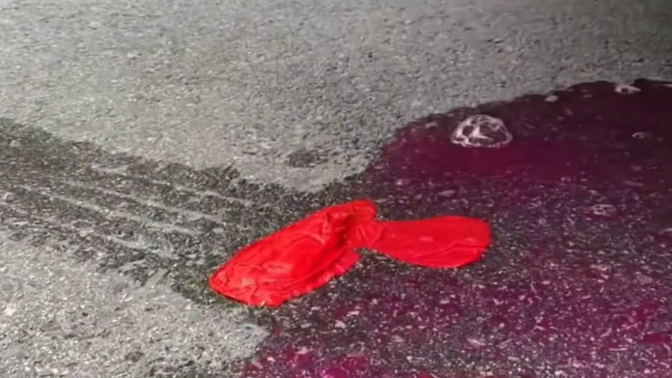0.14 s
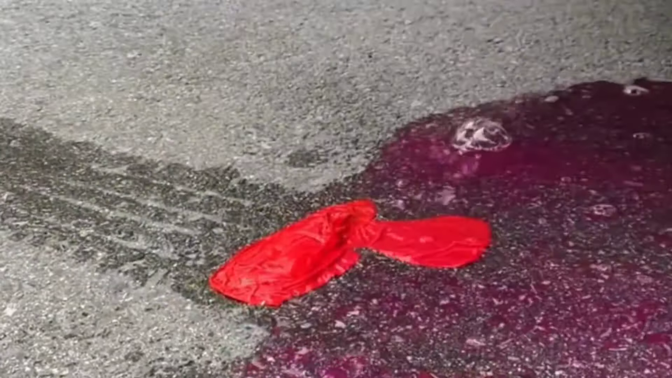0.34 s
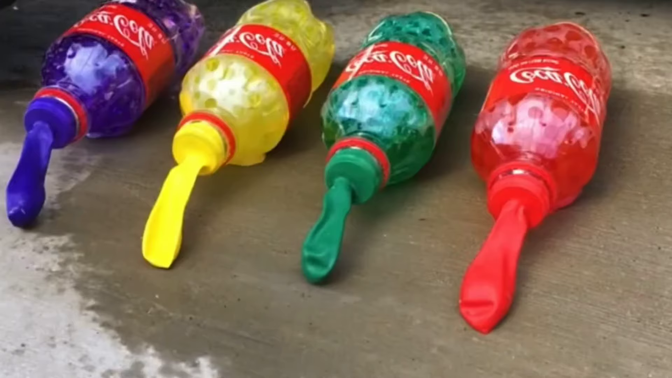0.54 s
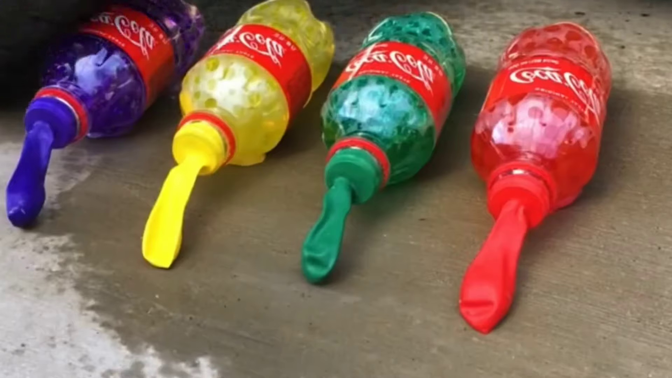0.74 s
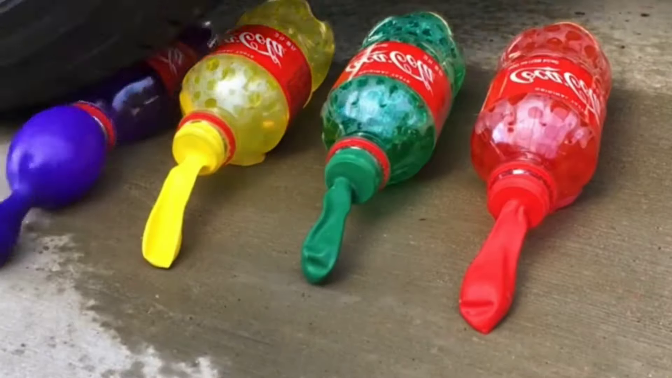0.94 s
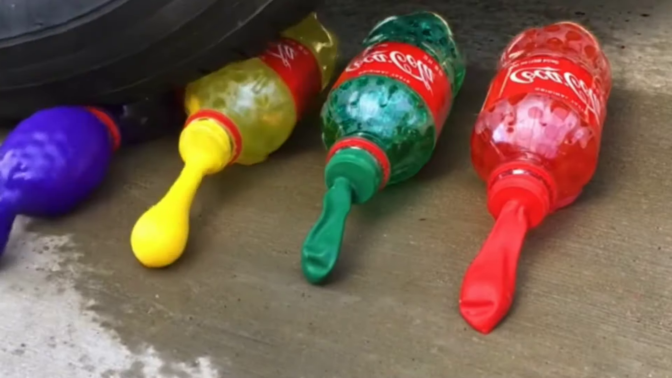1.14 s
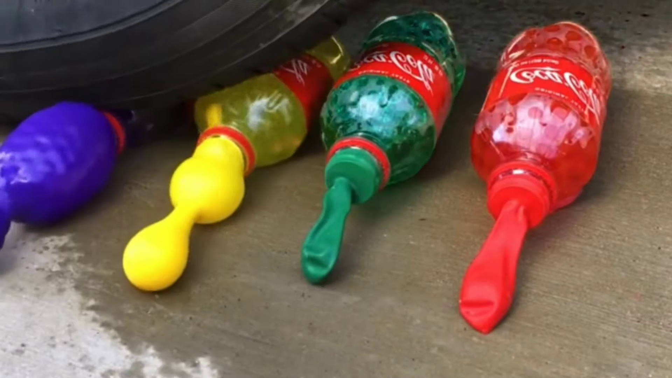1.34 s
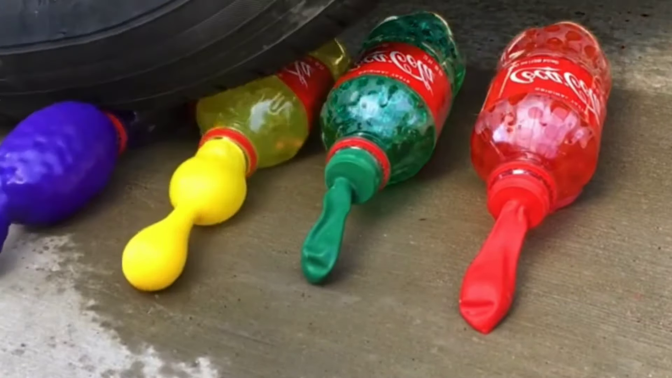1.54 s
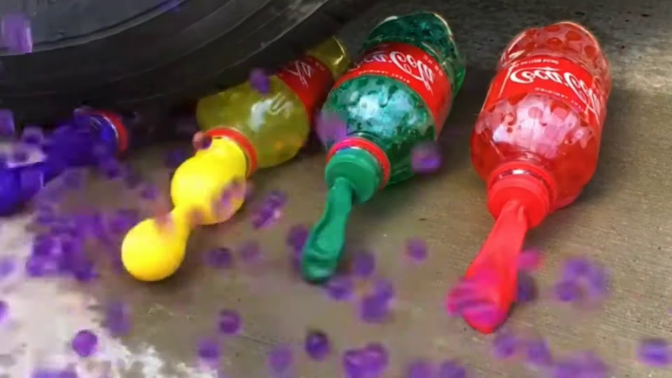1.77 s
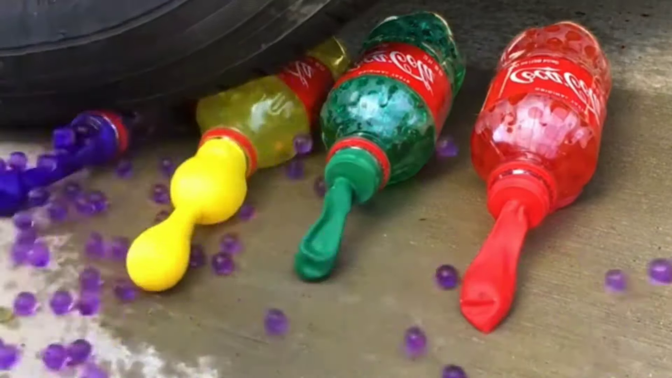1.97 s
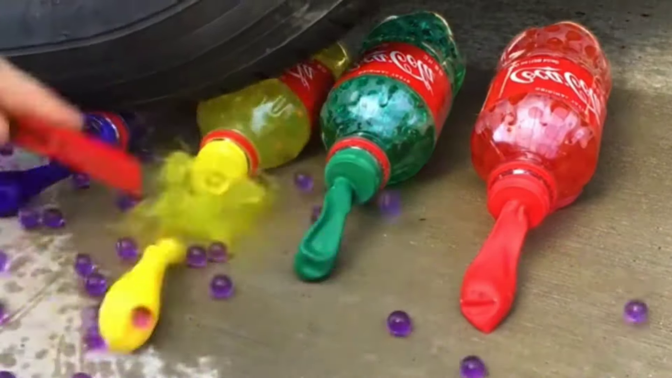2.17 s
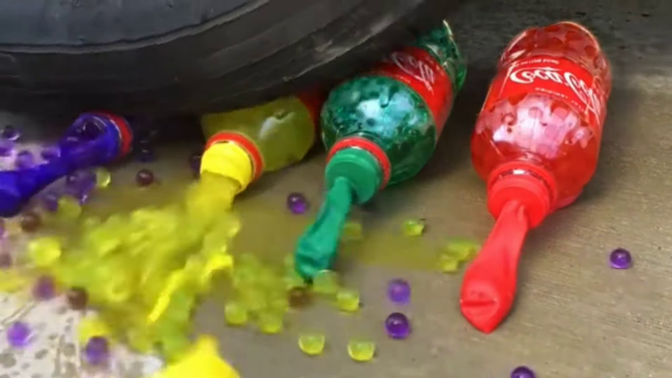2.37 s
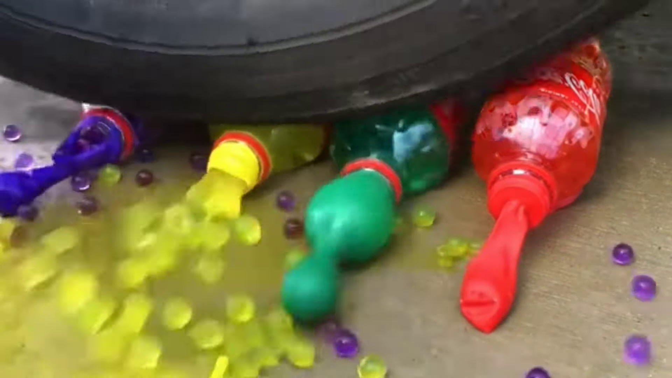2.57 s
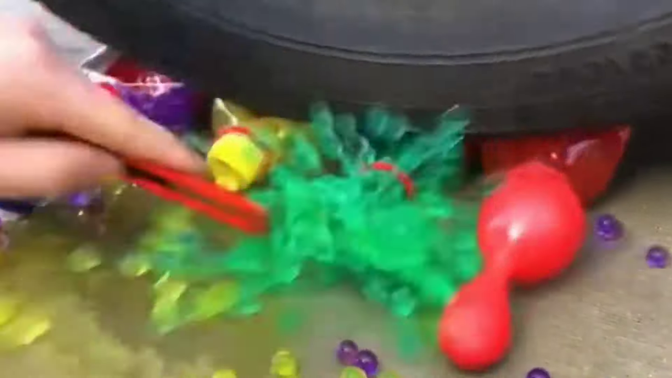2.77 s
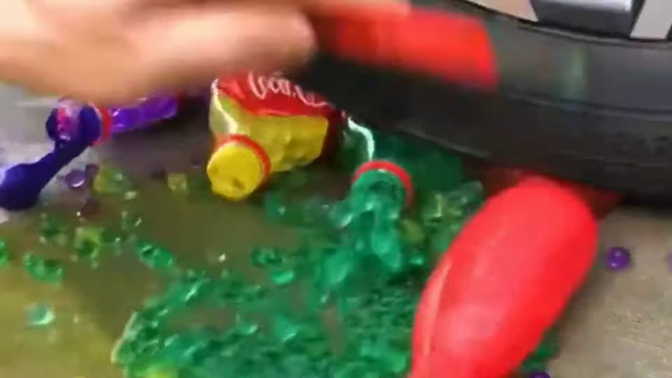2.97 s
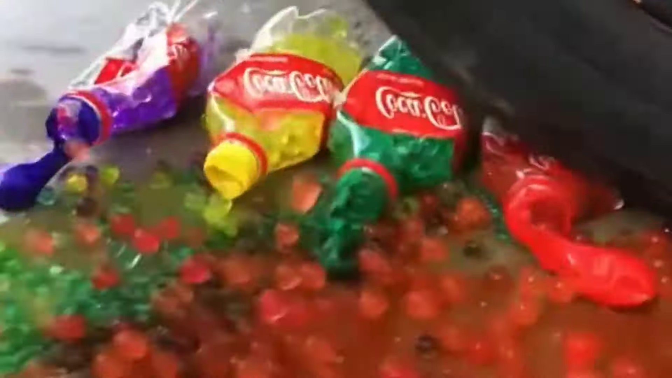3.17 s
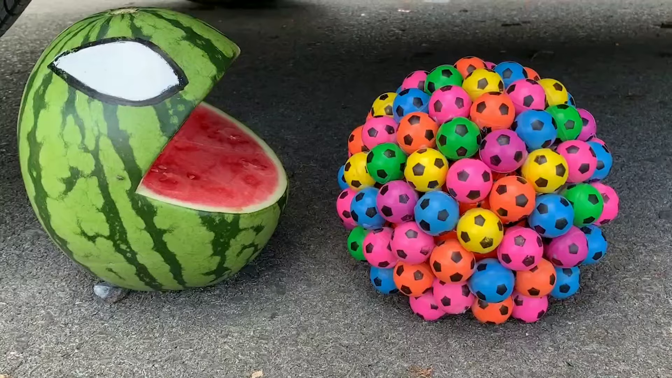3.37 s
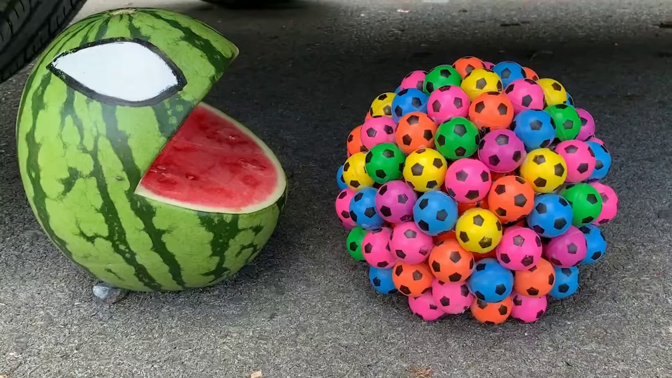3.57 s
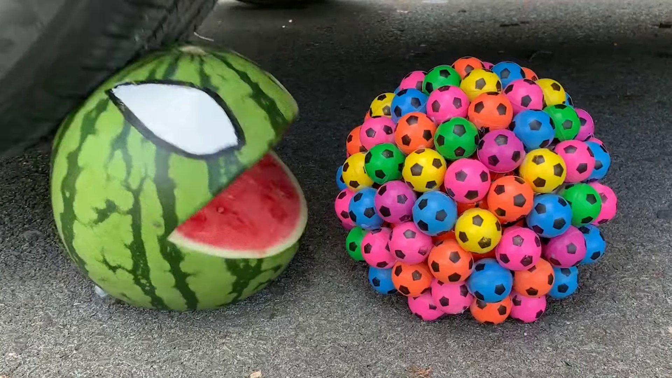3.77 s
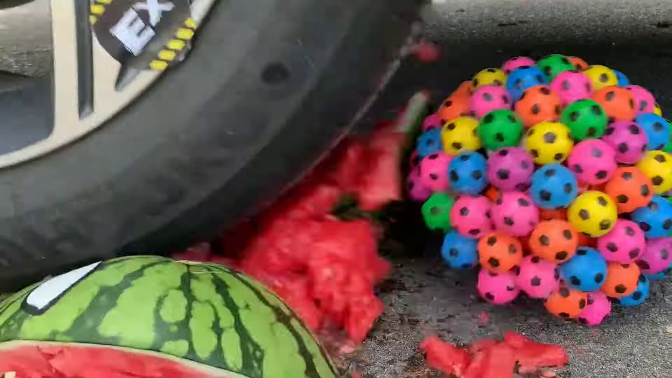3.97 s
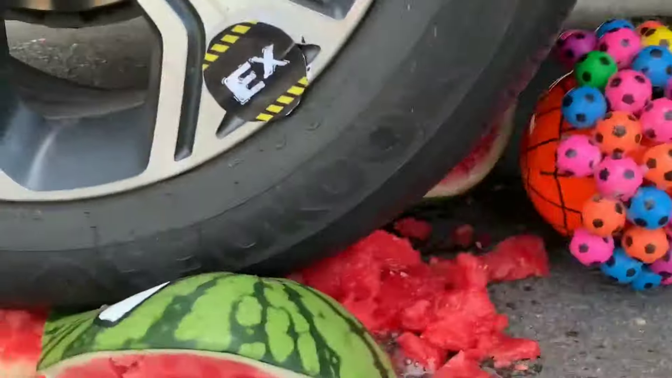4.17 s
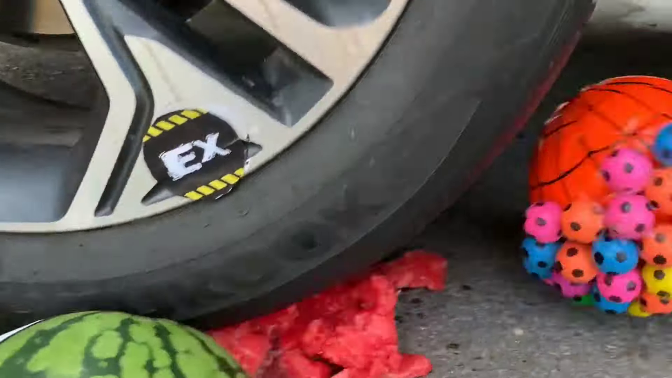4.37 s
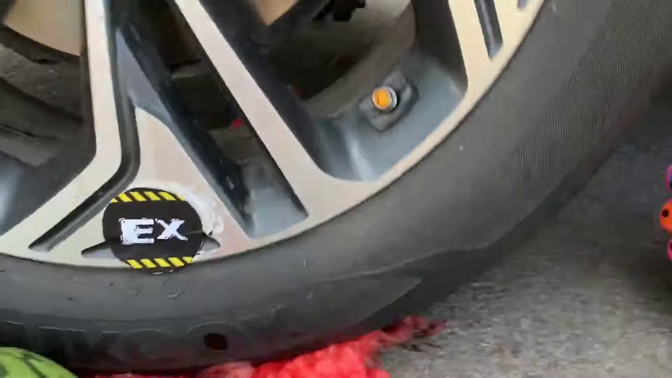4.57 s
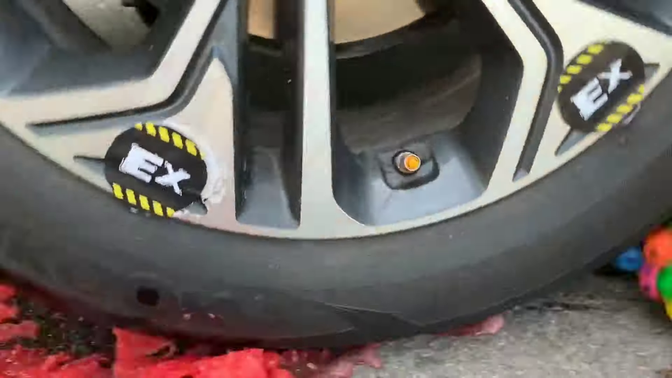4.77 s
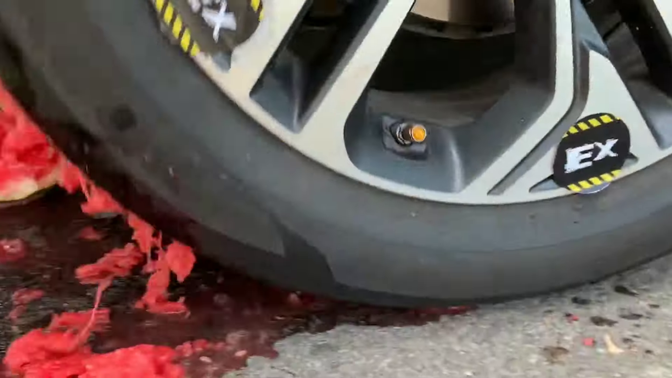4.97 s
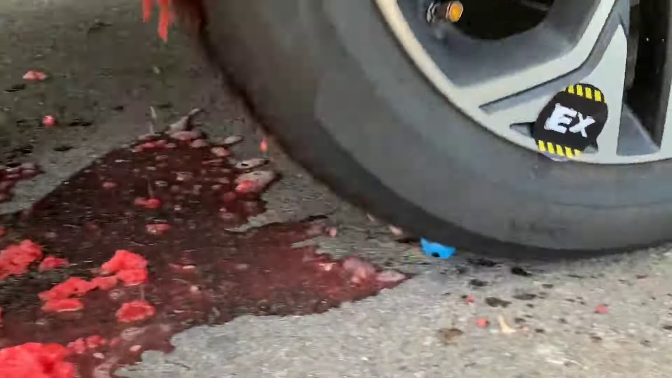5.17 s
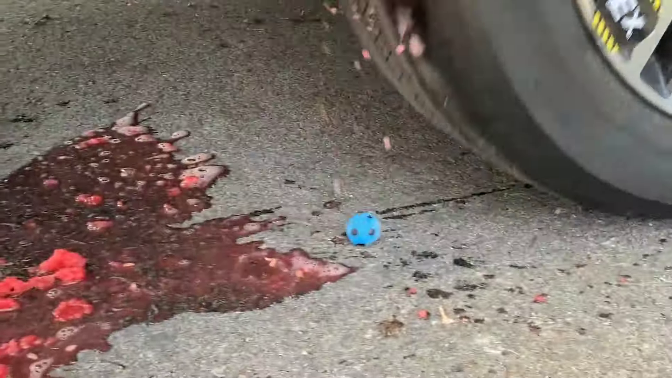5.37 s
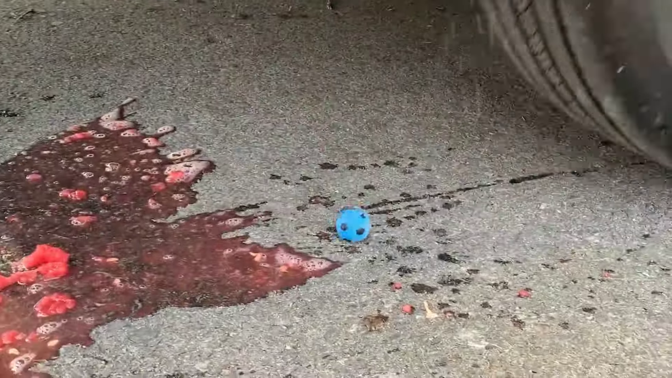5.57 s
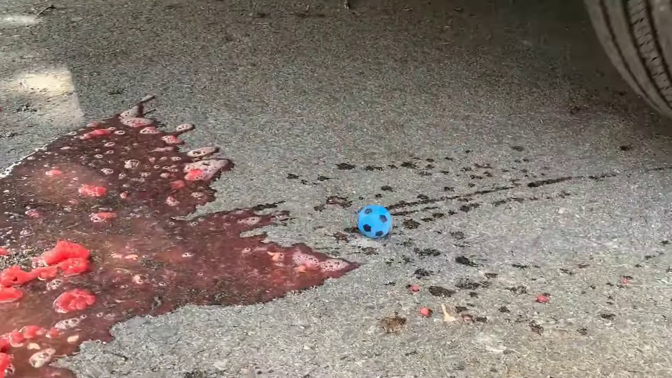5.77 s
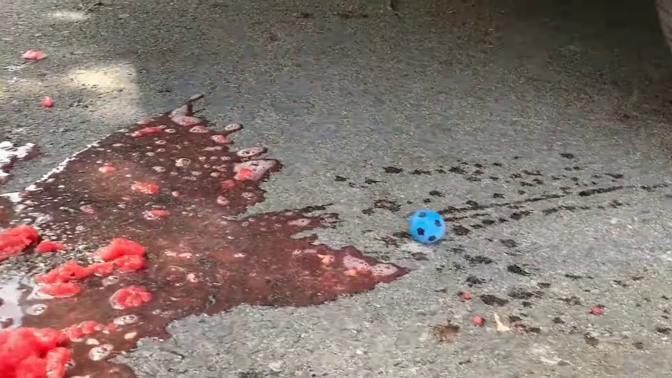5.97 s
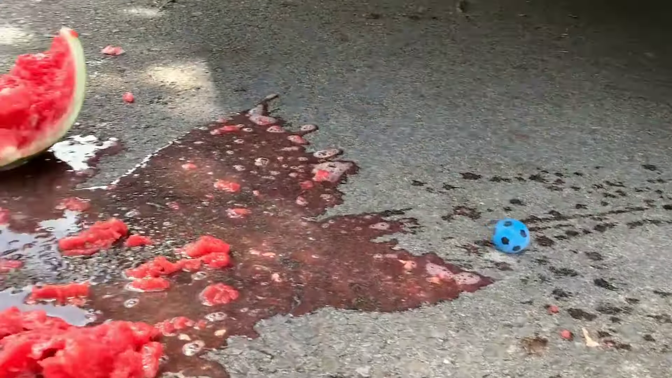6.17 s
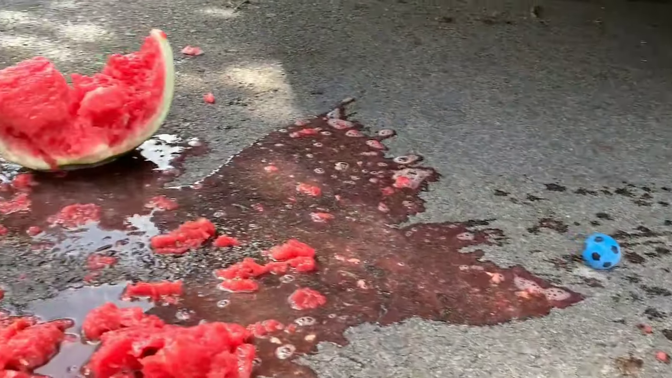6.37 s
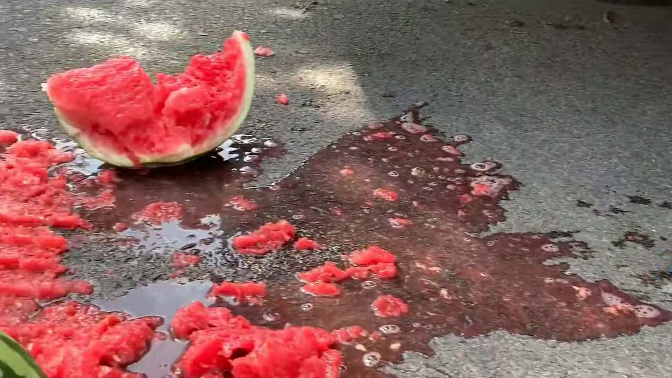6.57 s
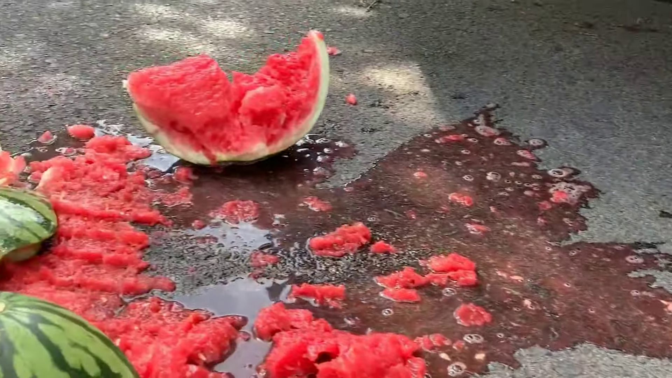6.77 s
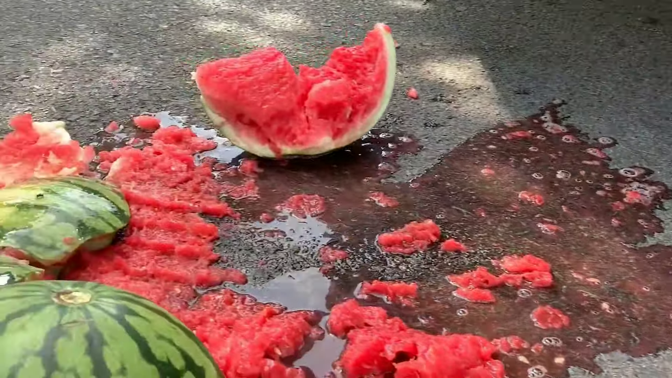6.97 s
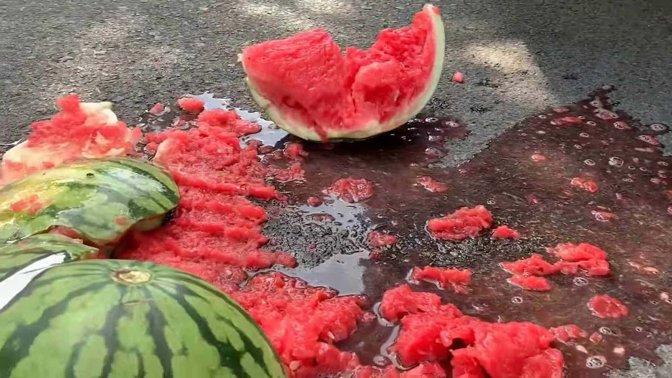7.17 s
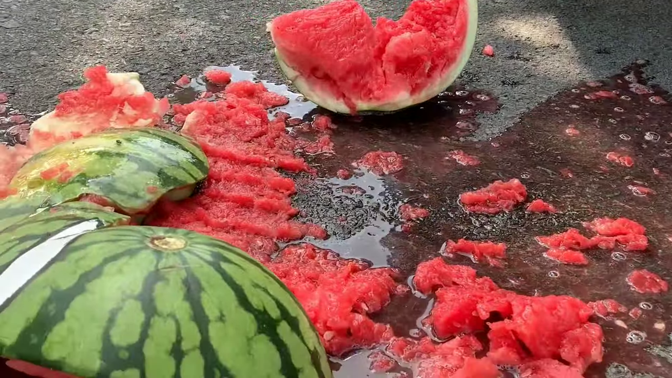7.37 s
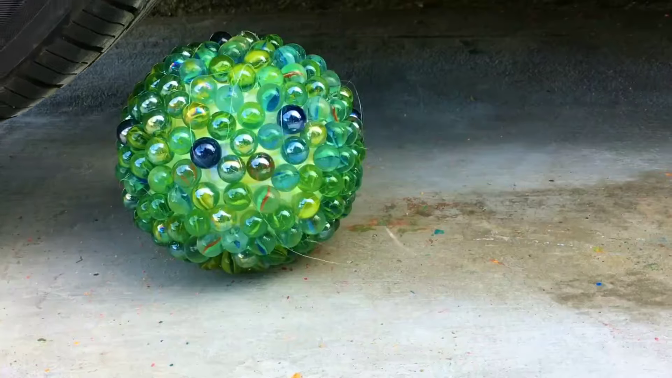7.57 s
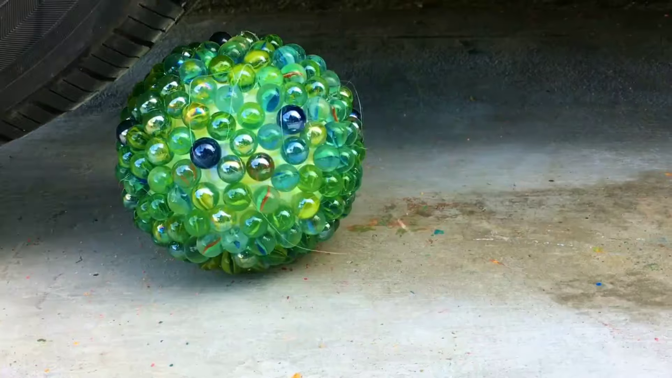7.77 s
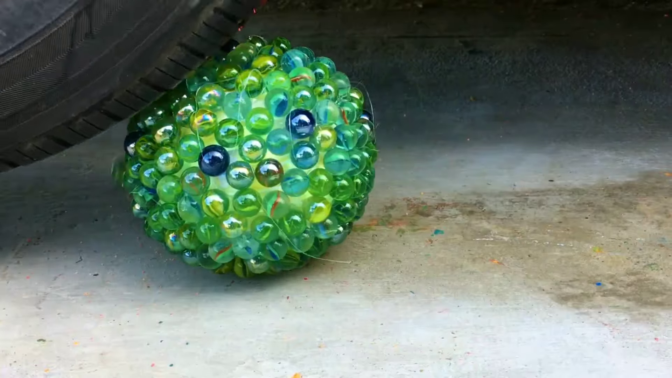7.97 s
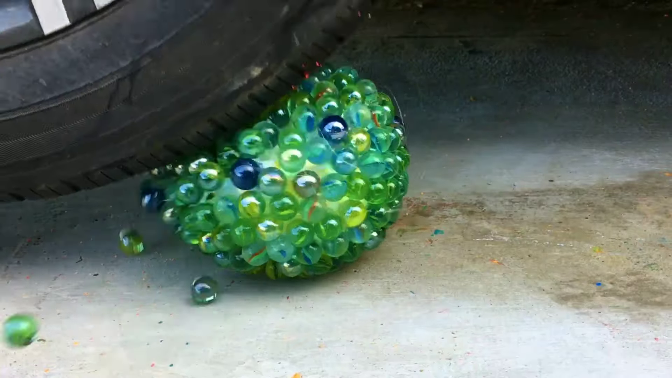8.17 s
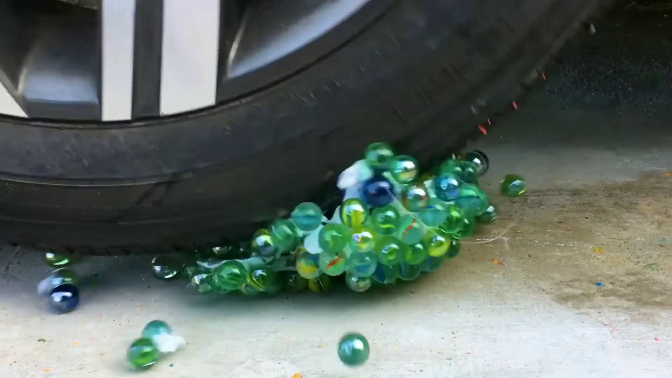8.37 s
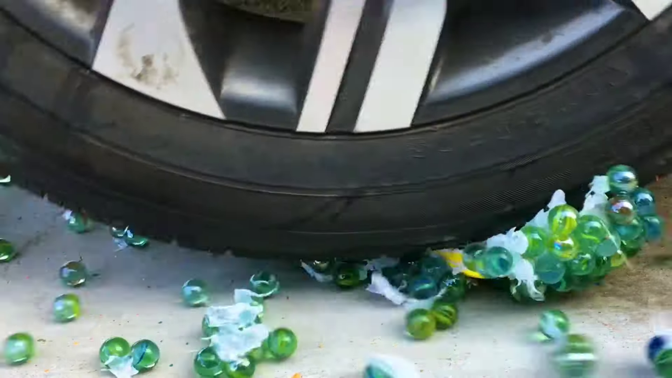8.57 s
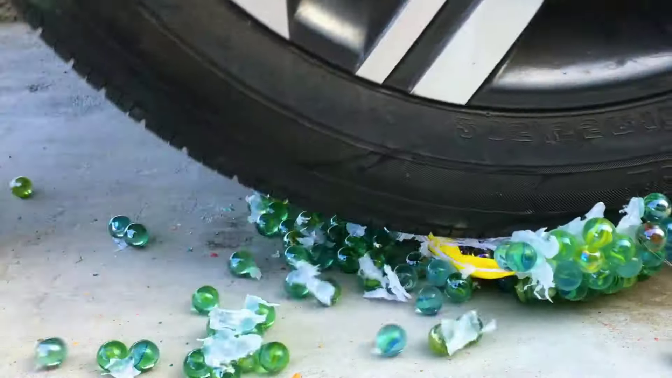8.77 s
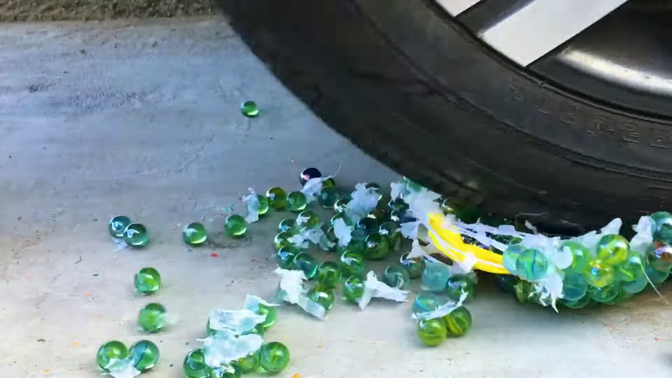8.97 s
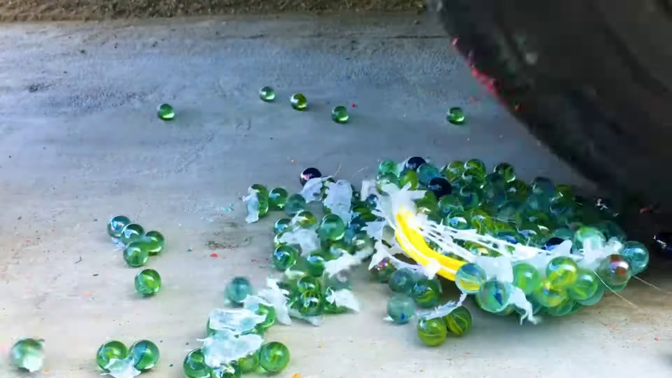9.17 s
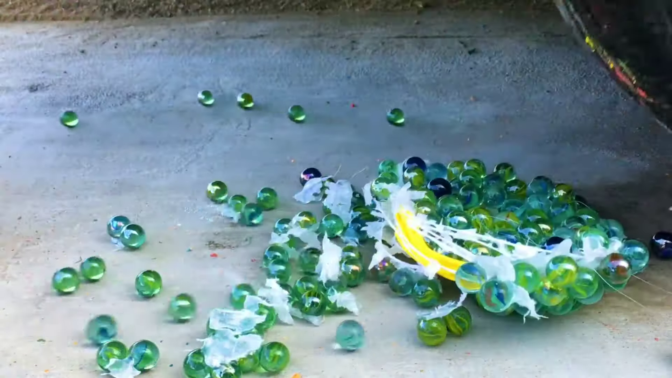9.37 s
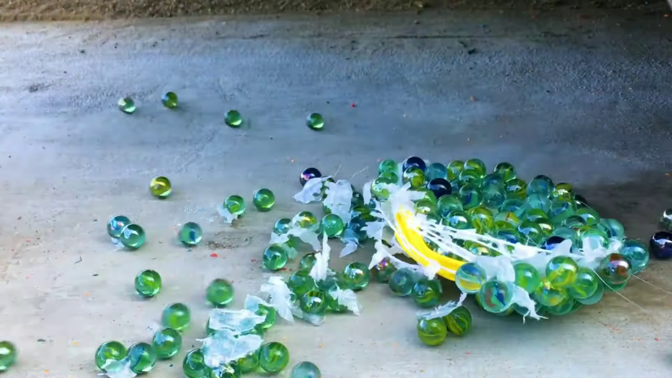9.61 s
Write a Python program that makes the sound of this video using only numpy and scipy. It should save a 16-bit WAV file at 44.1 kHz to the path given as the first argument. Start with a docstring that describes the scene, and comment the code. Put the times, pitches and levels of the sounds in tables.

```python
"""Outdoors, in four joined shots: a quiet yard, then a tyre crushing bead-filled plastic bottles,
a melon, a marble-covered ball. Airs are coloured noise, hums are noise in narrow resonances; an idling car
and faint ringing lie behind the melon. Grinding, surges and cracks drive noisy resonances of body, shell
and chips; snaps and splinters are decaying sines, squelches and one low thud pairs of wobbling tones.
Bottles and marbles are mono with the bass cut, yard and melon wide, dull stereo."""
import sys
import numpy as np
from scipy import signal
from scipy.fft import rfft, irfft
from scipy.io import wavfile
from scipy.ndimage import uniform_filter1d

SR = 44100
rng = np.random.default_rng(int(sys.argv[2]) if len(sys.argv) > 2 else 0)


def generate_wav(signal):
    """Clip the signal to [-1, 1] and save it as 16-bit WAV at the path in sys.argv[1]."""
    frames = np.transpose(np.atleast_2d(signal))
    scaled = np.clip(frames, -1, 1) * 32767
    pcm = np.round(scaled).astype(np.int16)
    wavfile.write(sys.argv[1], SR, pcm)


N = 425124
TOP_HZ = 16000
PORT_LAG_SAMPLES = 21


def undb(db):
    """Amplitude factor from dB."""
    return 10 ** (np.asarray(db) / 20)


def colour(x, table):
    """Causal filter of the (Hz, dB) shape; white noise keeps its power. Also gives the power share per bin."""
    hz = np.maximum(np.arange(4097) * SR / 8192, 1)
    table_hz, table_db = np.array(table).T
    db = np.interp(np.log(hz), np.log(table_hz), table_db)
    # folding the cepstrum makes the response causal
    cepstrum = irfft(np.log(undb(db) + 1e-7))
    cepstrum[1:4096] *= 2
    cepstrum[4097:] = 0
    response = irfft(np.exp(rfft(cepstrum)))[None, :4096]
    response = response / np.sqrt(np.sum(response ** 2))
    out = signal.oaconvolve(x, response, axes=1)[:, :x.shape[1]]
    return out, hz, undb(2 * db) / np.sum(undb(2 * db))


def walk(rate_hz, count):
    """Random levels held 1 / rate_hz s and slewed; spread near 1."""
    hold = int(SR / rate_hz)
    steps = np.repeat(rng.standard_normal(count // hold + 1), hold)
    return 1.17 * uniform_filter1d(steps, hold)[:count]


def fade(s, t60_s):
    """Sudden start at 0, then 60 dB down in t60_s."""
    return (s >= 0) * np.exp(-np.log(1000) * np.maximum(s, 0) / t60_s)


def resonate(x, hz, width_hz):
    """One resonance; white noise keeps its power."""
    return np.sqrt(SR / (np.pi * width_hz)) * signal.lfilter(*signal.iirpeak(hz, hz / width_hz, SR), x)


def noise(count, alike):
    """Mono if alike is 1; else two microphone ports that share a part, the right one a little later."""
    if alike == 1:
        return rng.standard_normal((1, count))
    shared = rng.standard_normal(count + PORT_LAG_SAMPLES)
    own = rng.standard_normal((2, count))
    alike = np.clip(alike, 0, .99)
    ports = np.array([shared[PORT_LAG_SAMPLES:], shared[:count]])
    return np.sqrt(alike) * ports + np.sqrt(1 - alike) * own


def air(table, hums, start_s, end_s, db, waver_db, alike):
    """Rumble, hums and hiss of one shot; bass and treble waver apart."""
    out = np.zeros((2, N))
    i = slice(int(start_s * SR), min(N, int(end_s * SR)))
    count = i.stop - i.start
    whole = colour(noise(count, alike), table)[0]
    low = signal.sosfilt(signal.butter(2, 350, fs=SR, output="sos"), whole)
    high = whole - low
    hum = sum(undb(hum_db + waver_db * walk(4.99, count)) * resonate(noise(count, alike), hz, width_hz)
              for hz, width_hz, hum_db in hums)
    out[:, i] = low * undb(waver_db * walk(8.2, count)) + high * undb(.93 * walk(5, count)) + hum
    return out * undb(db)


# Air of the yard. Each row: frequency in Hz, relative density in dB per Hz.
YARD_COLOUR = [(25, -10), (92, -2), (285, -19.5), (416, -14), (2690, -28), (16000, -42.5)]
# Narrow engine hums. Each row: frequency in Hz, width in Hz, level in dB against the air.
YARD_HUM = [(91.5, 4, -6), (418, 6, -15), (2730, 30, -16)]


def quiet_yard():
    """Distant rumble, hums and hiss, louder on the left."""
    stereo = air(YARD_COLOUR, YARD_HUM, start_s=0, end_s=.512, db=-45, waver_db=1.8, alike=.14)
    return stereo * undb([[3.3], [1.7]])


# Air of the bottle and marble shots. Each row: frequency in Hz, relative density in dB per Hz.
BOTTLE_AIR_COLOUR = [(25, -12), (476, -24), (560, -1.5), (1400, -8), (2900, -17), (13000, -22),
                     (16000, -15)]
MARBLE_AIR_COLOUR = [(35, -8), (150, -18), (489, -36), (560, -8.5), (1160, -5.5), (1520, -16), (9000, -22),
                     (13200, -19), (16000, -16)]


def mono_air():
    """Thin wavering air behind bottles and marbles; a narrow hum behind the bottles."""
    bottle_hum = [(2690, 60, -14)]  # Hz, width Hz, dB against the air
    bottles = air(BOTTLE_AIR_COLOUR, bottle_hum, start_s=.522, end_s=3.25, db=-60.5, waver_db=1.2, alike=1)
    marbles = air(MARBLE_AIR_COLOUR, [], start_s=7.455, end_s=9.64, db=-52.5, waver_db=1.2, alike=1)
    return bottles + marbles


# Idling car. Each row: frequency in Hz, relative density in dB per Hz.
IDLE_COLOUR = [(15, -30), (28, 3), (130, -9), (190, -8.5), (490, -22), (1000, -25.5), (3660, -35.5),
               (7200, -43.5), (9500, -62), (12000, -84.5), (22000, -120)]
# Narrow engine hums. Each row: frequency in Hz, width in Hz, level in dB against the air.
IDLE_HUM = [(53.8, 4, -8), (177.7, 3, -7), (257.4, 6, -12.5), (430, 6, -20), (646, 10, -19.5)]
# Swell as the car is neared. Each row: time in seconds, relative level in dB.
IDLE_LEVEL = [(3.255, -48.5), (3.9, -45), (5.5, -40), (6.6, -36.5), (7.45, -36.5)]


def idling_car():
    """Coloured noise and narrow hums that swell as the car is neared."""
    level_s, level_db = np.transpose(IDLE_LEVEL)
    idle = air(IDLE_COLOUR, IDLE_HUM, level_s[0], level_s[-1], db=1.16, waver_db=1.52, alike=.2)
    return idle * undb(np.interp(np.arange(N) / SR, level_s, level_db))


# Ringing modes. Each row: frequency in Hz before the pitch factor, width setting in Hz, relative level in dB.
RING_MODES = [(2085, 15, 3.5), (3640, 100, 8), (5060, 50, -1), (5930, 30, -7)]
# Strokes. Each row: start in seconds, relative level in dB, pitch factor, extra level of the lowest mode in dB.
RING_STROKES = [(6.07, -57, .965, 3), (6.238, -53, .97, -12), (6.795, -52, 1.01, -12),
                (6.955, -52, .995, 4)]


def ringing():
    """Metallic strokes: each shakes a few narrow modes that start high, sag, and come in a little apart."""
    t60_s = .6
    out = np.zeros((2, N))
    s = np.arange(int(t60_s * SR)) / SR
    for start_s, db, pitch, lowest_db in RING_STROKES:
        sag = pitch * (1 + .02 * np.exp(-s / .05))
        for k, (hz, width_hz, mode_db) in enumerate(RING_MODES):
            late_s = .02 * rng.random()
            # slow complex noise widens the mode
            lowpass = signal.butter(1, width_hz, fs=SR, output="sos")
            shake = signal.sosfilt(lowpass, rng.standard_normal((2, 2, len(s))))
            tone = np.real((shake[0] + 1j * shake[1]) * np.exp(2j * np.pi * np.cumsum(hz * sag) / SR))
            shape = uniform_filter1d(fade(s - late_s, t60_s), 600) * np.sqrt(SR / (np.pi * width_hz))
            start = int(start_s * SR)
            out[:, start:start + len(s)] += undb(db + mode_db + lowest_db * (k == 0)) * shape * tone
    return out


# Squeezed hollows, and one low thud at 6.61 s. Each row: centre in seconds, pitch in Hz, relative level in dB.
SQUELCHES_AND_THUD = [(1.78, 2700, -24), (2.715, 1607, -21), (2.77, 1190, -22), (3.015, 900, -28),
                      (3.085, 620, -22), (4.02, 1400, -24), (4.07, 1400, -19), (4.125, 521, -26),
                      (4.335, 331, -29.5), (4.238, 2300, -24), (4.925, 800, -30), (6.61, 115.6, -32),
                      (8.298, 1500, -18), (8.61, 750, -18), (8.72, 946, -18), (8.728, 1550, -12),
                      (8.738, 2000, -11), (8.817, 2500, -20), (9.198, 1000, -15)]


def squelches_and_thud():
    """Short swells of two wobbling tones gliding up: hollows that shrink, and one low thud."""
    out = np.zeros(N)
    for t, hz, db in SQUELCHES_AND_THUD:
        half_ms = 10.5 * (1000 / hz) ** .55  # lower ones last longer
        s = np.arange(-2 * half_ms, 2 * half_ms, 1000 / SR) / 1000
        place = s * 1000 / half_ms
        wobble = uniform_filter1d(rng.standard_normal((2, len(s))), 150)  # the two tones beat
        phase = 2 * np.pi * np.cumsum(hz * (1 + .03 * place + 1.8 * wobble), axis=1) / SR
        k = int((t + s[0]) * SR)
        out[k:k + len(s)] += undb(db) * np.exp(-place ** 2) * np.sin(phase).sum(axis=0)
    return out


def grains(rate_hz, spread_db, tail_s, dense):
    """Power of many small fractures of unequal size over a dense bed; mean 1."""
    sizes = undb(2 * spread_db * rng.exponential(size=N).clip(0, 2.5))
    hits = (rng.random(N) < rate_hz / SR) * sizes
    pole = np.exp(-1 / (tail_s * SR))
    power = signal.lfilter([1 - pole], [1, -pole], hits)
    return dense + (1 - dense) * power / power.mean()


def shards(power, split_hz, rate_hz, lo_hz, hi_hz, cycles, db):
    """Small splinters ring for some cycles, each at its own pitch, following the level of the crushing."""
    out = np.zeros(N)
    busy = np.flatnonzero(power[1] > 1e-7)
    for when, pitch, size in rng.random((int(rate_hz * len(busy) / SR), 3)):
        k = busy[int(when * len(busy))]
        hz = lo_hz * (hi_hz / lo_hz) ** pitch
        s = np.arange(min(int(cycles * SR / hz), N - k)) / SR
        gain = np.sqrt(power[np.searchsorted(split_hz, hz), k]) * undb(db - 12 * size)
        out[k:k + len(s)] += gain * fade(s, 2 * cycles / hz) * np.sin(2 * np.pi * hz * s)
    return out


def parts_db(db, weight_db, tilt):
    """Levels of body, shell and chips from the shell level and the weight of the crush."""
    body_db, chips_db, body_per_db, chips_per_db = tilt
    body = body_db + body_per_db * weight_db
    chips = chips_db + chips_per_db * weight_db
    return db + np.array([body, 0 * weight_db, chips])


def grind_and_surge(grind, surges, tilt, rise_fall):
    """Power of body, shell and chips: steady grinding, plus a swell wherever the object gives way."""
    s = np.arange(N) / SR
    grind_s, grind_db, grind_weight_db = np.array(grind).T
    on = (s > grind_s[0]) & (s < grind_s[-1])
    levels_db = parts_db(np.interp(s, grind_s, grind_db), np.interp(s, grind_s, grind_weight_db), tilt)
    power = on * undb(2 * levels_db)
    rise, fall = rise_fall
    for t, db, weight_db, length_ms in surges:
        i = slice(int((t - length_ms / 1000) * SR), int((t + length_ms / 500) * SR))
        corners = [-rise / 2, rise / 2, 1 - fall, 1 + fall / 2]
        swell = np.interp((s[i] - t) * 1000 / length_ms, corners, [0, 1, 1, 0]) ** 2
        power[:, i] += undb(2 * parts_db(db, weight_db, tilt))[:, None] * swell
    return power


def add_cracks(power, knocks, cracks, reach, crack_db, t60s_s, knock_db):
    """Each crack adds a puff of power and a snap: a decaying sine with a few chance overtones."""
    s = np.arange(N) / SR
    body_hz, body_slope, shell_hz, shell_slope = reach
    for t, db, hz, chips_db in cracks:
        # body and shell lose level per octave away from their own pitch
        body_db = -body_slope * abs(np.log2(hz / body_hz))
        shell_db = -shell_slope * abs(np.log2(hz / shell_hz))
        i = slice(int(t * SR), int((t + .2) * SR))
        since = s[i] - t
        gain = undb(2 * (db + crack_db + np.array([[body_db], [shell_db], [chips_db]])))
        rise = np.clip(since / .0005, 0, 1)
        tail = fade(since, np.array(t60s_s)[:, None]) ** 2
        tick = 1.2 * fade(since, .008) ** 2
        power[:, i] += gain * rise * (tail + tick)
        modes = np.minimum(hz * np.r_[1, 3 ** rng.uniform(-.5, 1, size=3)], 14000)[:, None]
        mode_gain = np.where(modes == hz, 1, .5 * hz / np.maximum(modes, hz))
        snap = (np.sin(2 * np.pi * modes * since) * mode_gain).sum(axis=0)
        knocks[i] += undb(max(db, db + chips_db) + knock_db) * fade(since, t60s_s[0]) * snap


def ring_pieces(power, split_hz, patchy_db, patch_rate_hz, alike):
    """Pieces of every size ring by turns: noise in a bank of resonances, each with its own wandering level."""
    count = power.shape[1]
    blend = 1.25  # pieces within this factor of a parting frequency share both neighbours' drive
    edges = np.log(np.outer(split_hz, [1 / blend, blend]).ravel())
    pieces = 0
    for hz in 40 * 2 ** np.arange(0, 8.7, 1 / 4):
        place = np.interp(np.log(hz), edges, [0, 1, 1, 1.999])
        k, mix = int(place), place % 1
        shared_power = power[k] ** (1 - mix) * power[k + 1] ** mix
        drive = np.sqrt(shared_power) * undb(patchy_db * walk(patch_rate_hz, count))
        sharpness = min(8, hz / 45)  # big pieces are damped more
        ring = signal.lfilter(*signal.iirpeak(hz, sharpness, SR), drive * noise(count, alike))
        pieces = pieces + np.sqrt(sharpness / 8) * ring
    return pieces


def crush(grind, surges, cracks, table, *, tilt, rise_fall, reach, split_hz, grit, crack_db, t60s_s,
          knock_db, patchy_db, patch_rate_hz, splinters, alike):
    """Grinding, surges and cracks drive body, shell and chips, parted at split_hz; splinters and snaps join."""
    power = grind_and_surge(grind, surges, tilt, rise_fall)
    knocks = shards(power, split_hz, **splinters)
    power *= grit
    add_cracks(power, knocks, cracks, reach, crack_db, t60s_s, knock_db)
    end_s = max(grind[-1][0], cracks[-1][0]) + .3
    i = slice(int((grind[0][0] - .1) * SR), min(N, int(end_s * SR)))
    # the colour's own power in each part is divided out
    _, hz, share = colour(np.zeros((1, 1)), table)
    power /= np.bincount(np.searchsorted(split_hz, hz), share * (hz < TOP_HZ))[:, None]
    pieces = ring_pieces(power[:, i], split_hz, patchy_db, patch_rate_hz, alike)
    out = np.zeros((2, N))
    out[:, i] = colour(pieces, table)[0] * undb(-.15 * patchy_db ** 2)  # offsets the gain of patchiness
    if alike != 1:
        knocks = np.array([knocks, np.roll(knocks, PORT_LAG_SAMPLES)])
    no_bass = signal.butter(4, split_hz[0] / 3, "high", fs=SR, output="sos")
    return out + signal.sosfilt(no_bass, knocks)


# Grinding under the tyre. Each row: time in seconds, relative shell level in dB, weight in dB (more is duller).
BOTTLE_GRIND = [(.853, -47, 6), (1.1, -34, -3), (1.4, -44, 0), (1.62, -36.5, -4), (1.85, -43, -1),
                (2.2, -47, 6), (2.45, -36, -7), (2.7, -33, 0), (2.97, -45, 2), (3.14, -34.5, 1),
                (3.25, -48, 0)]
# Giving way. Each row: time half risen in seconds, relative shell level in dB, weight in dB, length in ms.
BOTTLE_SURGES = [(.899, -24, -6, 44), (1.022, -29, -14, 32), (1.135, -26, 0, 52), (1.26, -31, -5, 60),
                 (1.76, -19, -13, 36), (2.307, -26, -5, 54), (2.484, -19, -2, 30), (2.614, -27, 0, 56),
                 (2.7, -23, 1, 40), (2.818, -25, 4, 36), (2.862, -24, 1, 54), (3.003, -32, 10, 36),
                 (3.054, -26, 5, 52)]
# Cracks. Each row: start in seconds, relative level in dB, snap pitch in Hz, chips in dB against that level.
BOTTLE_CRACKS = [(.9047, -14, 3900, 0), (1.0276, -13.5, 4610, -12), (1.0423, -10.5, 2470, -3),
                 (1.0645, -7.5, 2730, -18), (1.1339, -11.5, 1340, -3), (1.22, -14.5, 3800, 0),
                 (1.3248, -10, 1390, 4), (1.4247, -8.5, 3300, -10), (1.736, -14, 6730, 5),
                 (1.7395, -13, 4000, 2), (2.3064, -7, 966, 0), (2.389, -24, 2500, -4),
                 (2.484, -4, 1390, -3), (2.6135, -5.5, 1050, -4), (2.6824, -7, 1480, -3),
                 (2.7272, -6, 2770, -13), (2.7671, -11, 1190, -15), (2.822, -15, 2760, -20),
                 (2.865, -11, 6330, 4), (2.8801, -11, 1080, -14), (2.9827, -24, 856, 2),
                 (3.0536, -18, 931, -6), (3.1278, -12, 800, 3), (3.222, -28, 2900, -6)]
# Colour of the bottles. Each row: frequency in Hz, relative density in dB per Hz.
BOTTLE_COLOUR = [(60, -18), (384, -35), (573, -5.5), (1570, -2), (2770, -4), (4980, -7), (14000, -7),
                 (15900, -14)]


def crushed_bottles():
    """Bead-filled plastic bottles: hard shells with fine, gritty fractures."""
    return crush(
        BOTTLE_GRIND, BOTTLE_SURGES, BOTTLE_CRACKS, BOTTLE_COLOUR,
        tilt=(-.5, 2, 1, -.25),  # body dB, chips dB at weight 0; body, chips dB per dB of weight
        rise_fall=(.4, .5),  # shares of a surge's length
        reach=(900, 7.5, 2700, 1.5),  # body Hz, dB per octave; shell Hz, dB per octave
        split_hz=(1500, 5000), grit=grains(rate_hz=250, spread_db=5.5, tail_s=.0015, dense=.57),
        crack_db=.4, t60s_s=(.034, .03, .023), knock_db=-9.5, patchy_db=3.6, patch_rate_hz=25,
        splinters=dict(rate_hz=300, lo_hz=600, hi_hz=9000, cycles=45, db=5), alike=1)


# Grinding, then pulp rustling under the rolling tyre.
# Each row: time in seconds, relative shell level in dB, weight in dB.
MELON_GRIND = [(3.77, -46, 2), (3.87, -36, 3), (4.0, -27, 10), (4.065, -20, 14), (4.125, -26, 13),
               (4.15, -41, 4), (4.19, -30, 10), (4.355, -36, 8), (4.37, -62, 4), (4.75, -58, 5),
               (4.89, -53, 6), (5.1, -64, 4)]
# Giving way. Each row: time half risen in seconds, relative shell level in dB, weight in dB, length in ms.
MELON_SURGES = [(3.931, -24, 3, 58), (4.069, -21, 13, 24), (4.23, -24, 12, 30), (4.905, -38, 1, 50)]
# Cracks; the late ones are ticks of grit.
# Each row: start in seconds, relative level in dB, snap pitch in Hz, chips in dB against that level.
MELON_CRACKS = [(3.931, -8, 480, -24), (4.069, -1, 426, -19), (4.231, -13, 2300, -14),
                (4.448, -35, 2300, -20), (4.915, -23, 634, -5), (5.194, -30, 1000, -10),
                (6.658, -36, 374, 5), (6.733, -36, 2000, 3), (6.785, -39, 366, 2)]
# Colour of the melon. Each row: frequency in Hz, relative density in dB per Hz.
MELON_COLOUR = [(24, -33), (40, -19), (100, -16), (191, -7), (313, -19), (554, -8), (850, -14),
                (1390, -13.5), (7130, -26.5), (15000, -59)]


def crushed_melon():
    """A soft, heavy body: low parting frequencies, slower grains and longer tails, in stereo."""
    return crush(
        MELON_GRIND, MELON_SURGES, MELON_CRACKS, MELON_COLOUR,
        tilt=(0, 2.5, 0, -1), rise_fall=(.2, .7), reach=(400, 10, 1500, 5),
        split_hz=(700, 2500), grit=grains(rate_hz=200, spread_db=2.8, tail_s=.003, dense=.4),
        crack_db=0, t60s_s=(.045, .04, .03), knock_db=-7, patchy_db=3.8, patch_rate_hz=30,
        splinters=dict(rate_hz=250, lo_hz=300, hi_hz=3000, cycles=24, db=5), alike=.25)


# Grinding under the tyre. Each row: time in seconds, relative shell level in dB, weight in dB.
MARBLE_GRIND = [(7.985, -56, 0), (8.02, -34, -4), (8.195, -31, -6), (8.24, -25, -8), (8.37, -21, -6),
                (8.43, -28, -5), (8.7, -25, 1), (8.76, -41, 11), (8.89, -37, 2), (9.04, -44, 4),
                (9.24, -47, -3), (9.42, -50, -2), (9.64, -69, 7)]
# Giving way. Each row: time half risen in seconds, relative shell level in dB, weight in dB, length in ms.
MARBLE_SURGES = [(8.025, -24, -8.5, 60), (8.12, -24, -11, 65), (8.297, -14, -13, 52), (8.494, -20, -10, 34),
                 (8.59, -21, 5, 75), (8.695, -24, 5, 50), (8.865, -35, 3, 30), (8.915, -34, 3, 65),
                 (9.058, -35, 11, 60), (9.158, -30.5, 17, 50)]
# Cracks. Each row: start in seconds, relative level in dB, snap pitch in Hz, chips in dB against that level.
MARBLE_CRACKS = [(8.0225, -11.5, 5940, 2), (8.0275, -8, 4000, 0), (8.0344, -11, 2640, -6),
                 (8.1045, -16, 6040, 6), (8.118, -13, 6000, 2), (8.1744, -11, 2790, -1),
                 (8.2099, -6, 2180, 0), (8.267, -12, 2500, -3), (8.2794, -8, 5460, -5),
                 (8.4529, -15, 4380, 5), (8.5674, -5.5, 3430, -5), (8.575, -8, 3300, 0),
                 (8.588, -10, 900, -2), (8.694, -13, 5500, 4), (8.8145, -9, 1040, -28),
                 (8.8632, -28, 900, 12), (8.876, -26, 1000, 8), (8.9181, -28, 910, 15),
                 (8.98, -30, 810, 13), (9.005, -30, 3500, 4), (9.0874, -22, 877, 8), (9.1155, -15, 926, 1),
                 (9.1327, -13, 867, -3), (9.1522, -3, 880, -8), (9.2613, -38, 1710, 10),
                 (9.3849, -34, 7100, 12)]
# Colour of the marbles. Each row: frequency in Hz, relative density in dB per Hz.
MARBLE_COLOUR = [(60, -30), (412, -30), (600, -2), (916, 2), (1370, -9), (2600, -4.5), (4030, -8),
                 (11600, -11), (15900, -19)]


def crushed_marbles():
    """A marble-covered ball: dense, short fractures and many high splinters."""
    return crush(
        MARBLE_GRIND, MARBLE_SURGES, MARBLE_CRACKS, MARBLE_COLOUR,
        tilt=(-.5, 6.5, 1, .35), rise_fall=(.6, .7), reach=(900, 9, 2700, 9),
        split_hz=(1500, 5000), grit=grains(rate_hz=450, spread_db=4.5, tail_s=.0008, dense=.45),
        crack_db=-.5, t60s_s=(.03, .025, .018), knock_db=-10, patchy_db=3, patch_rate_hz=30,
        splinters=dict(rate_hz=500, lo_hz=1800, hi_hz=11000, cycles=60, db=5), alike=1)


def scene():
    """Wide yard and melon shots, mono bottle and marble shots, squelches and one thud."""
    dull = signal.butter(4, 10500, fs=SR, output="sos")
    far = signal.sosfilt(dull, idling_car() + ringing())
    wide = (crushed_melon() * undb(1.2) + far) * undb([[-1.1], [1.1]])  # left a little quieter
    near = mono_air() + crushed_bottles() + crushed_marbles()
    near -= .6 * signal.lfilter(*signal.iirpeak(10400, 14, SR), near)  # this microphone has a narrow dip
    return wide + quiet_yard() + squelches_and_thud() + near


def record(dry):
    """The loudest cracks are rounded off near full scale and the top is cut."""
    rounded = dry / (1 + dry ** 4) ** .29
    return signal.sosfilt(signal.ellip(12, .2, 100, TOP_HZ, fs=SR, output="sos"), rounded)


dry = scene()
out = record(dry)
generate_wav(out)
```